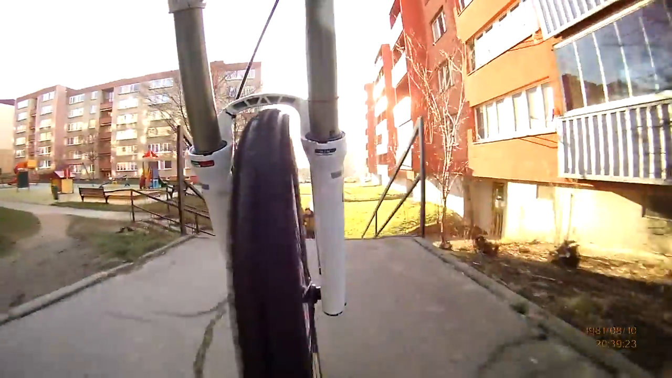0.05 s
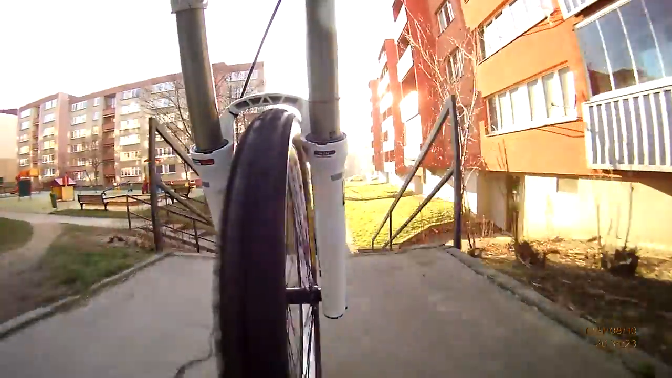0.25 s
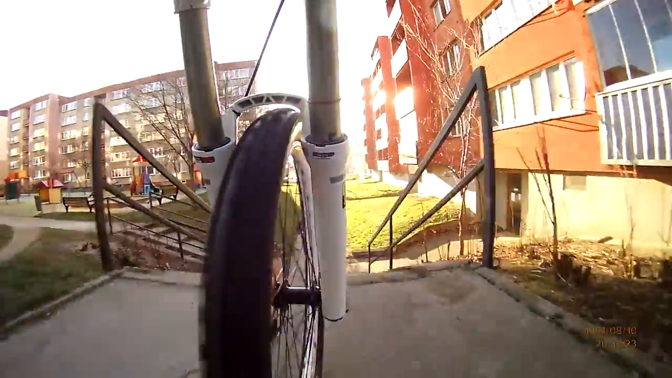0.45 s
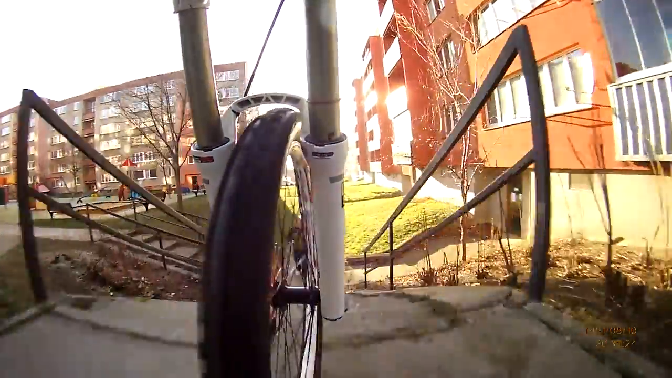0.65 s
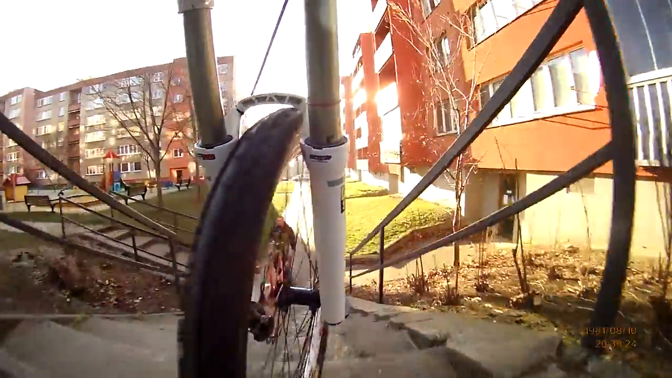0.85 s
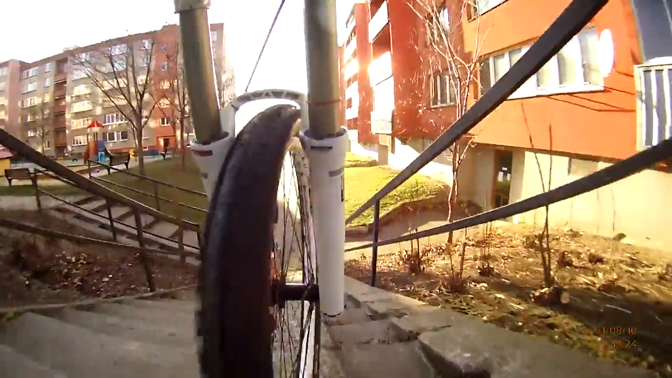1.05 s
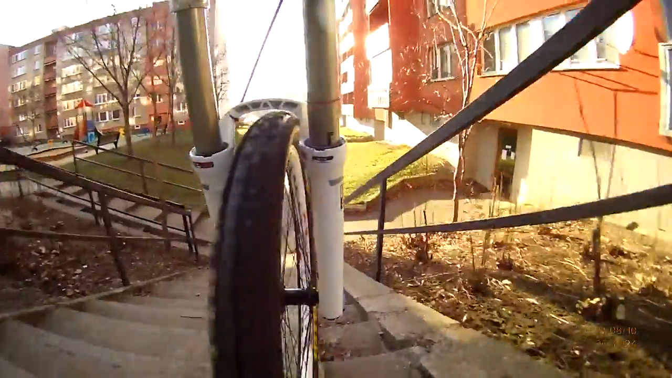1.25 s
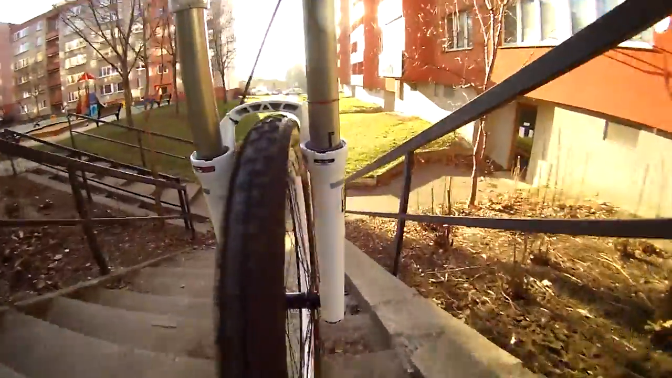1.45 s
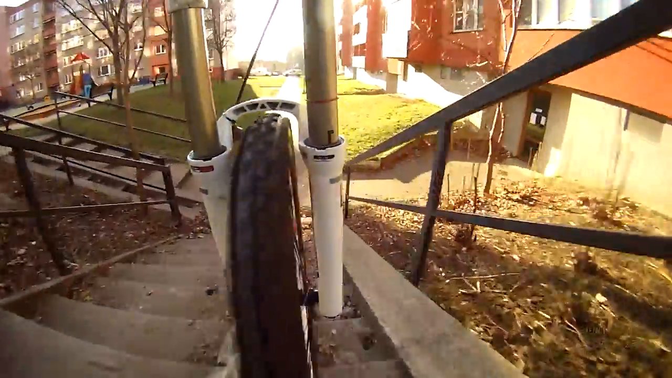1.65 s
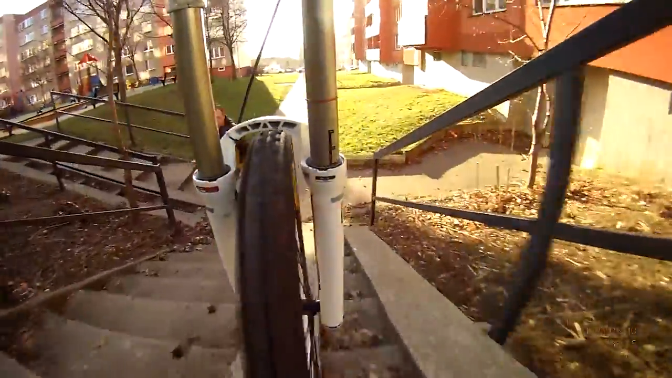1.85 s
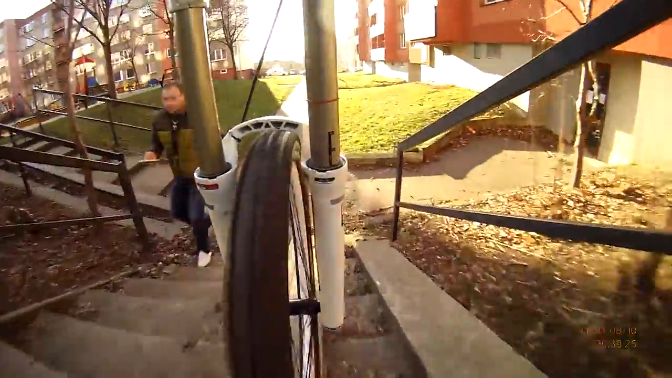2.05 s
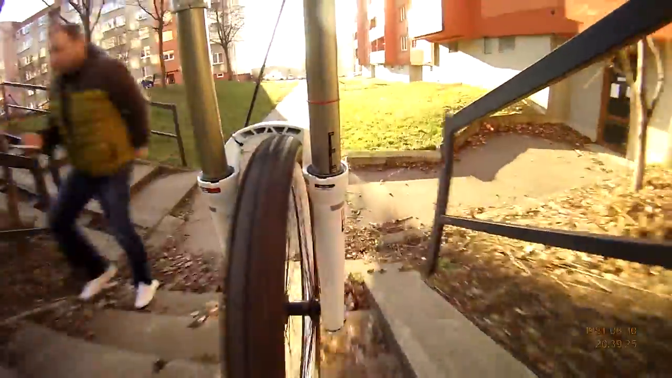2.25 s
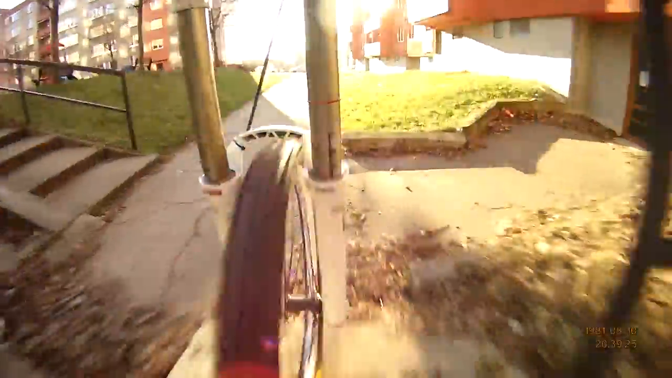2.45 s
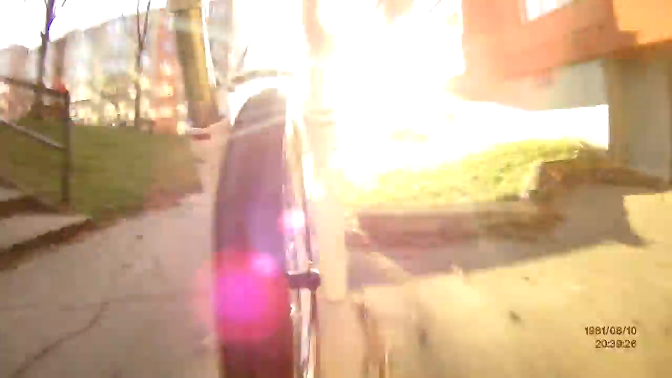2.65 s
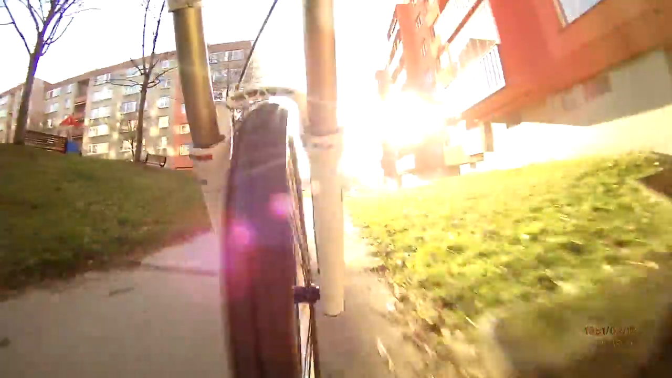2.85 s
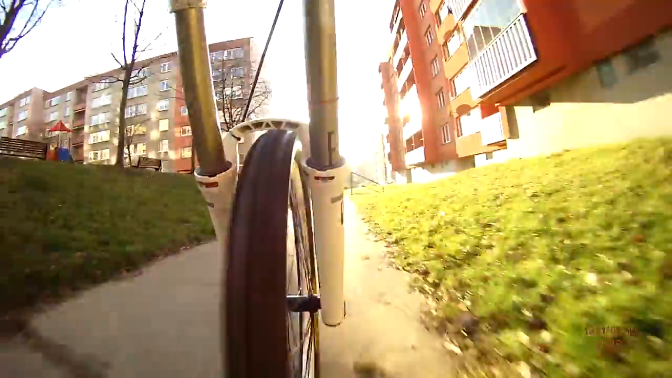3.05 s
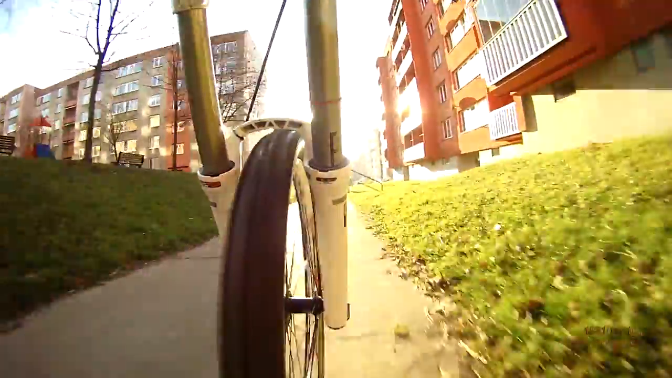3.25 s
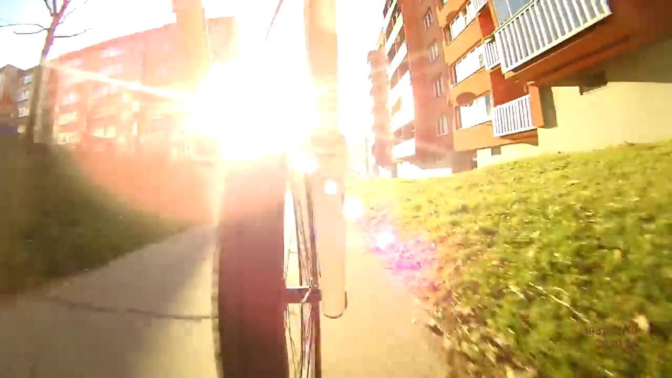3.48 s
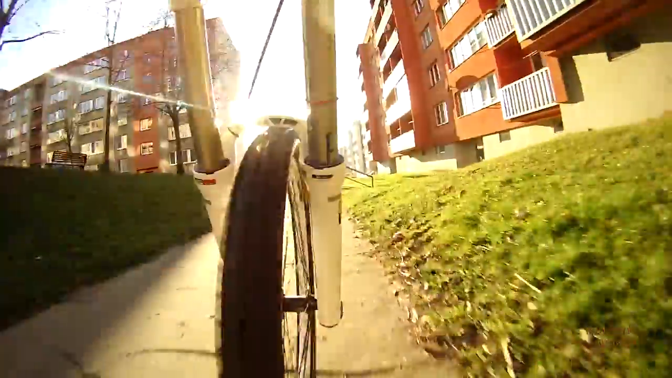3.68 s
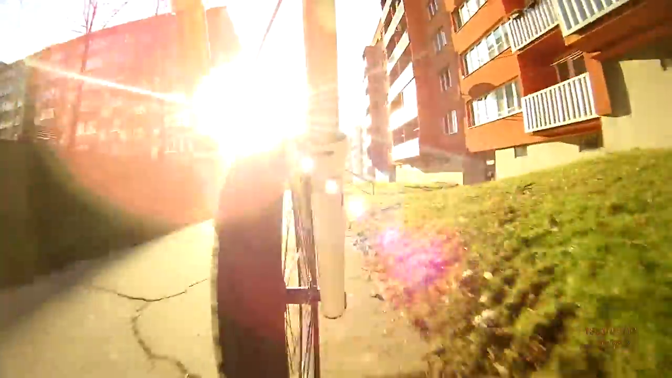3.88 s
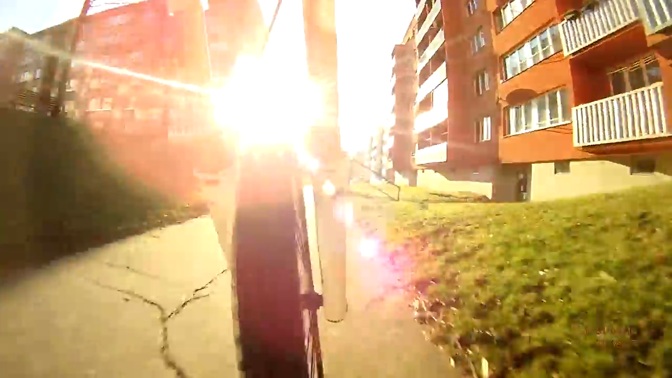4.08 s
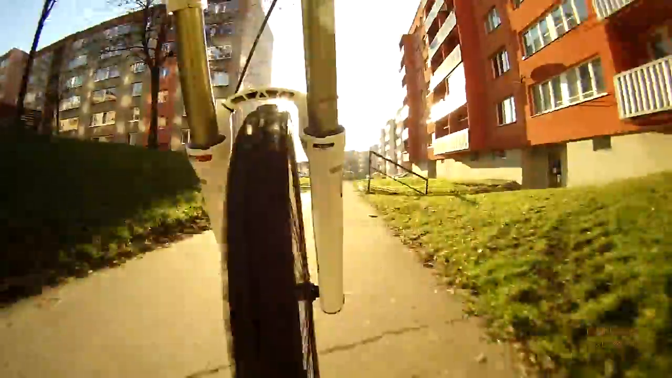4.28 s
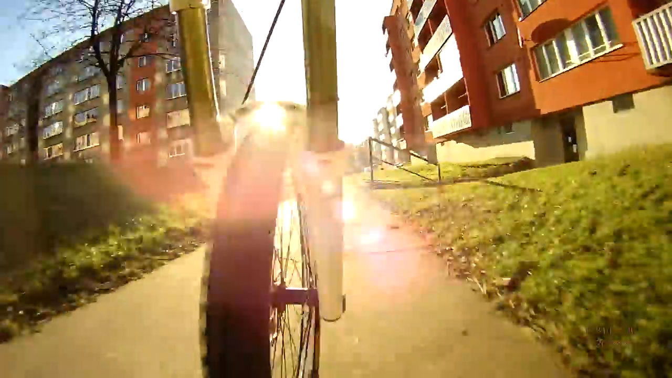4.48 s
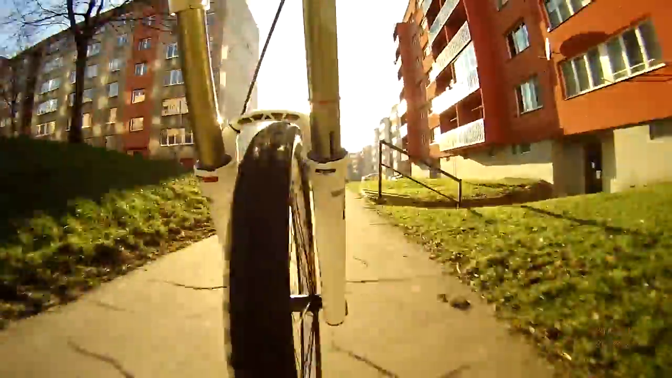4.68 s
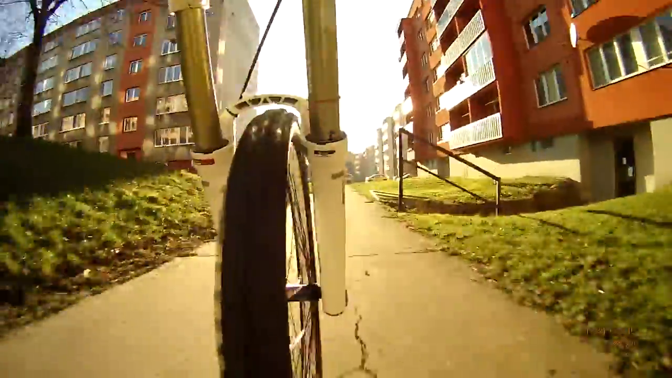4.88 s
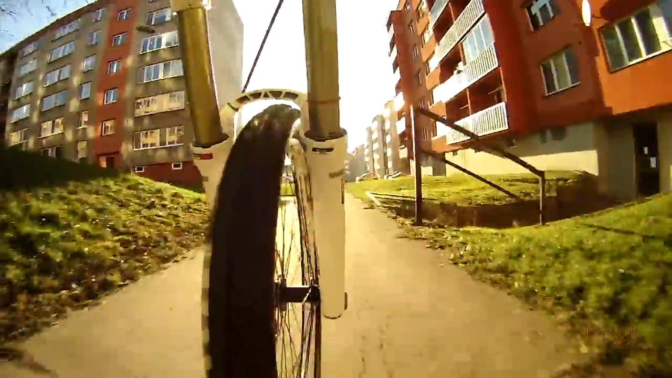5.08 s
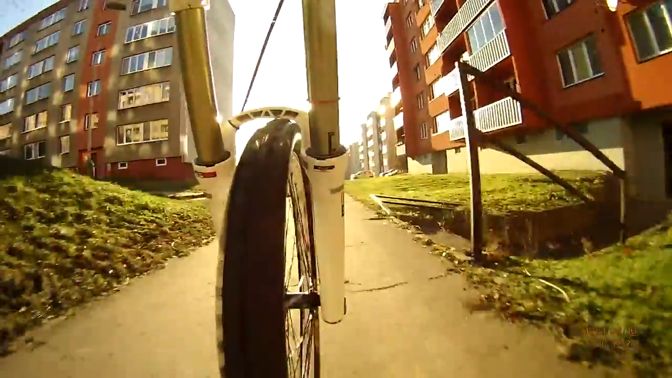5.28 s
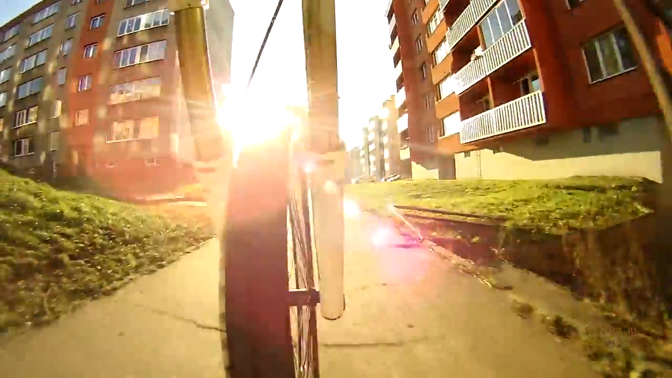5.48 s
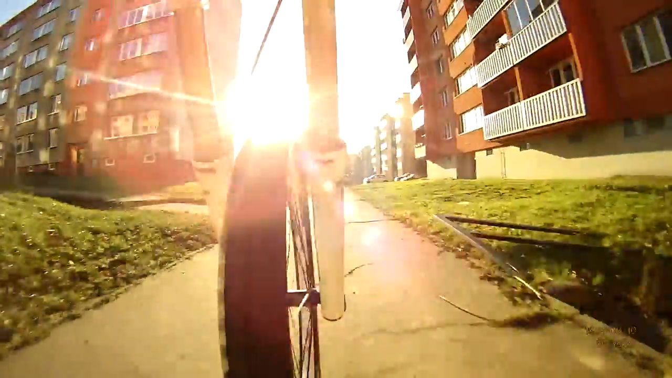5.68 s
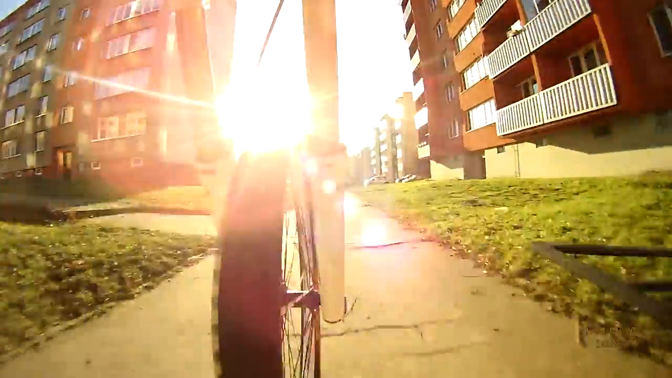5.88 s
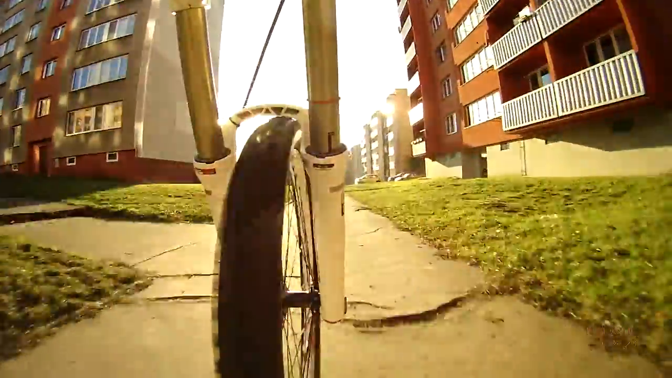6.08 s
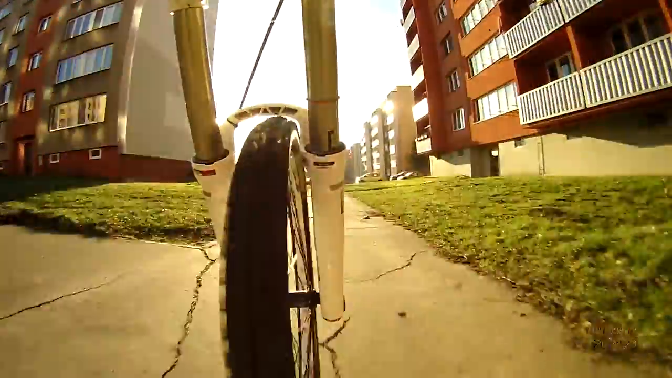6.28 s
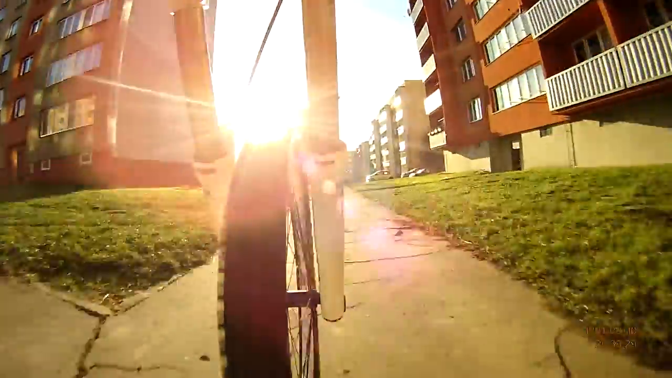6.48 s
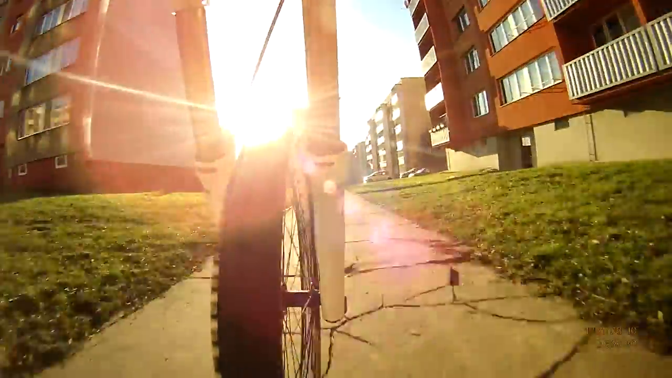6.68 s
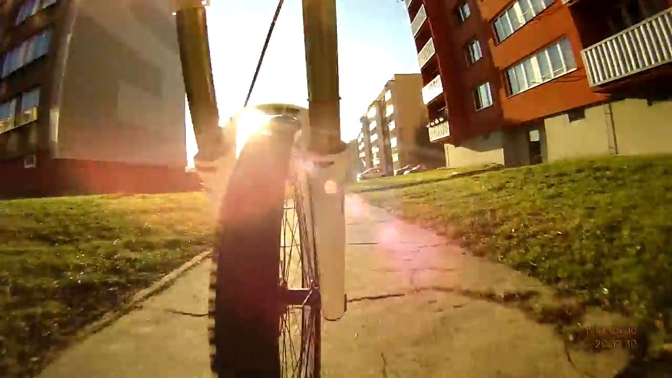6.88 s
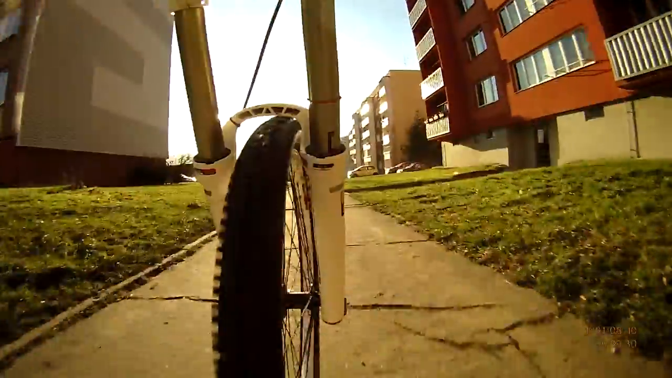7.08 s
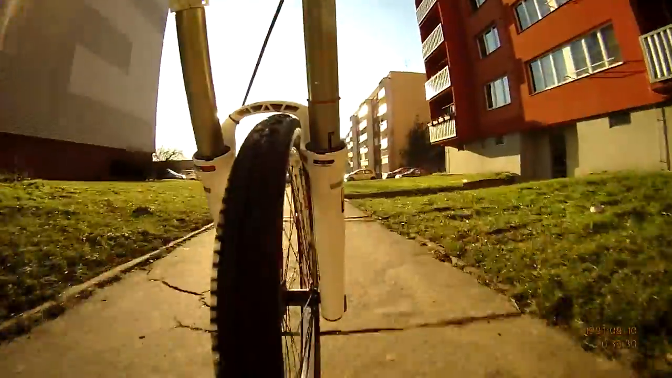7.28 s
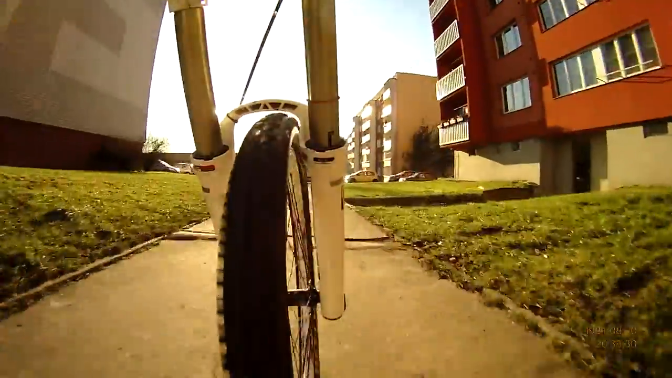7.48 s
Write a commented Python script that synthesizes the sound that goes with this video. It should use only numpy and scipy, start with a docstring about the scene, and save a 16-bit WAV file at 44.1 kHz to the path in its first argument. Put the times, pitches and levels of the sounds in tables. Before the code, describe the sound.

A microphone fixed to a mountain bike picks up close, dry, muffled vibration. The bike brakes softly and drops down stairs with hollow thuds and cable slaps, slams onto the path hard enough to clip, and coasts with quick metallic hub clicks and grit crackle. After the clicks end, only low rumble and mount hum remain, broken by a couple of cracks in the pavement near the end.

```python
"""On concrete stairs and a cracked path, a mountain bike with a camera on its frame brakes down, lands hard and coasts.
Each edge jolts the bike: it sways, thuds through the frame and makes loose parts knock and rattle.
The freewheel ticks in step with the wheel on the long coast, with a few faint single ticks early on.
Wheel speed drives the tyre rumble and the crackle of grit; rough ground shakes the bike, the camera mount hums,
and the brake hisses at the top of the stairs. The landing overloads the microphone."""
import sys
import numpy as np
from scipy import signal
from scipy.fft import rfft, irfft, next_fast_len
from scipy.io import wavfile
from scipy.ndimage import uniform_filter1d

SR = 44100
rng = np.random.default_rng(int(sys.argv[2]) if len(sys.argv) > 2 else 0)


def wav_record(signal):
    """Record a signal, one row per channel, as 16-bit PCM in the file named by sys.argv[1]."""
    frames = np.transpose(np.atleast_2d(signal))
    bounded = np.clip(frames, -1, 1)
    # unit amplitude maps onto the largest positive 16-bit level
    quanta = np.round(bounded * 32767).astype(np.int16)
    wavfile.write(sys.argv[1], SR, quanta)


N = 332514
T = np.arange(N) / SR  # time of every sample, in s


def amp(db):
    """Decibels to gain."""
    return 10 ** (np.asarray(db) / 20)


def unit(x):
    """Scale to rms 1."""
    return x / np.sqrt(np.mean(x ** 2))


def curve(rows):
    """A table of (t/s, value), joined by straight lines in time."""
    return np.interp(T, *np.transpose(rows))


def add(out, start_s, x):
    """Mix x into out from a start time, cutting off what runs past the end."""
    i = max(int(start_s * SR), 0)
    out[i:i + len(x)] += x[:max(N - i, 0)]


def colour(x, points):
    """Filter through (f/Hz, level/dB) points; minimum phase, so nothing sounds before its cause."""
    size = next_fast_len(len(x) + 2048)
    size += size % 2
    hz, db = np.transpose(points)
    f = np.maximum(np.arange(size // 2 + 1) * SR / size, 1)
    gain_db = np.interp(np.log(f), np.log(hz), db)
    # folding the cepstrum onto positive times gives the minimum phase
    cepstrum = irfft(np.log(amp(gain_db)))
    cepstrum[1:size // 2] *= 2
    cepstrum[size // 2 + 1:] = 0
    response = np.exp(rfft(cepstrum))
    return irfft(rfft(x, size) * response)[:len(x)]


def band(x, hz, width):
    """One resonance, gain 1 at its centre."""
    return signal.lfilter(*signal.iirpeak(hz, hz / width, fs=SR), x)


def ring(x, modes, leak=0.16):
    """A body of several resonances; a little of the blow passes straight through."""
    out = leak * x
    for k, (hz, width, db) in enumerate(modes):
        sign = (-1) ** k  # neighbouring resonances move in opposite directions
        out = out + sign * amp(db) * band(x, hz, width)
    return out


def walk(rate):
    """Smooth random wandering with a spread near 1, drawing new values at the given rate per second."""
    size = int(SR / rate)
    steps = np.repeat(rng.standard_normal(N // size + 1), size)
    return unit(uniform_filter1d(steps, size)[:N])


# jolts from steps, the landing and cracks:
# (t/s, sway level/dB, sway f/Hz, thud peak level/dB, f/Hz of the frame resonance hit hardest)
JOLTS = [(.945, -6, 24.3, -23.5, 368), (1.487, -7, 29, -15.5, 557), (1.503, -15.5, 140, -18.5, 110),
         (2.051, -9.5, 20, -26.5, 543), (2.309, -15, 24, -30, 390), (2.366, -11.5, 23, -23, 386),
         (2.43, -1.5, 24, -17, 280), (2.476, -6, 18, -21, 277), (2.521, 2.5, 19, -4, 275),
         (2.56, 3, 27, -11, 281.4), (2.611, 4.5, 14.8, 0.5, 291), (2.636, -9.5, 120, 2.5, 292),
         (2.665, -1, 20, -5, 296), (2.722, 10.5, 138, -0.5, 293), (2.804, -23, 59, -22, 265),
         (2.985, -15, 130, -10, 567), (2.998, -16, 130, -17, 172), (6.856, -8.5, 23.4, -24.5, 397),
         (7.04, -9.5, 17.6, -13.5, 380)]
# resonances of the frame: (f/Hz, width/Hz, level/dB)
FRAME_MODES = [(164.9, 39, -7.5), (255, 23.6, 1.5), (287, 26, -2), (407.4, 67.4, 6.5), (494.5, 66, 4),
               (552.4, 30.6, 10), (614, 47.4, 2), (845, 57, -7.5)]
# tone colour of thuds and tyre rumble: (f/Hz, level/dB)
TYRE_COLOUR = [(60, -31.5), (130, 4.5), (200, 1.5), (590, -8), (690, -7), (950, -9.5), (1300, -41),
               (3000, -83), (7000, -110)]


def jolts(thud_s=0.0095, contact_s=.001, mount_db=3, mode_db=8):
    """Each edge bounces the bike once on its tyres and thuds through frame and mount."""
    out, t = np.zeros(N), T[:SR // 4]
    contact = 1 - np.exp(-t / contact_s)
    for start_s, sway_db, sway_hz, thud_db, mode_hz in JOLTS:
        # the fourth power stops the sway after about one swing
        sway = contact * np.sin(2 * np.pi * sway_hz * t) * np.exp(-(sway_hz * t) ** 4)
        blow = rng.standard_normal(len(t)) * contact * np.exp(-t / thud_s)
        frame = ring(blow, FRAME_MODES, leak=0.33)
        hardest_hit = amp(mode_db) * band(frame, mode_hz, 34)
        mount = amp(mount_db) * band(blow, 105, 38)
        thud = colour(frame + hardest_hit + mount, TYRE_COLOUR)
        add(out, start_s, amp(sway_db) * sway + amp(thud_db) * thud / abs(thud).max())
    return out


# resonances of the camera case: (f/Hz, width/Hz, level/dB)
CASE_MODES = [(1023.3, 29, 7.5), (1262, 135, 9), (1462.4, 70, 9.5), (1597, 180, 3.5), (2193, 180, -0.5),
              (2421, 150, 3.5), (3570, 120, -15), (4574, 130, -26)]
# tone colour of loose parts: (f/Hz, level/dB)
RATTLE_COLOUR = [(250, -23), (900, -3.5), (1200, 2.5), (2600, 5.5), (2900, -4.5), (3600, -14.5),
                 (5500, -20.5), (6800, -41.5), (12000, -62.5)]


def knock(hz, decay_s, contact_s=0.00041, width_hz=1300, direct_db=-9, tail_db=-22, tail_s=0.013):
    """A loose part slaps and chatters in its own pitch region and rings the case; peak 1."""
    t = T[:SR // 8]
    onset = 1 - np.exp(-t / contact_s)
    fade = np.exp(-t / decay_s) + amp(tail_db) * np.exp(-t / tail_s)
    chatter = rng.standard_normal(len(t)) * onset * fade
    blow = band(chatter, hz, width_hz)
    sound = colour(ring(blow, CASE_MODES) + amp(direct_db) * blow, RATTLE_COLOUR)
    return sound / abs(sound).max()


# single knocks of cables, chain and fork: (t/s, peak level/dB, centre f/Hz, decay/s)
KNOCKS = [(0.917, -28, 3470, .0019), (.967, -19.5, 3000, .0013), (0.983, -27, 2800, .004),
          (1.489, -14.5, 1870, 0.0025), (1.55, -18.5, 2500, 0.0063), (1.575, -9.5, 1400, 0.00068),
          (1.775, -23, 1100, 0.0036), (1.848, -25.5, 4030, 0.0023), (2.068, -18.5, 1890, 0.001),
          (2.142, -25, 1500, .0025), (2.161, -25, 1790, 0.0018), (2.245, -21.5, 2300, 0.0018),
          (2.326, -17.5, 1700, .0018), (2.448, -17, 1600, 0.0098), (2.514, -14.5, 2520, .008),
          (2.526, -5, 2400, .006), (2.556, -6, 2050, 0.0075), (2.594, -10.5, 1990, 0.0054),
          (2.602, -6.5, 1492, 0.0045), (2.615, 1, 2210, .008), (2.634, 0, 1605, 0.0052),
          (2.662, 6, 1700, 0.0043), (2.721, 4.5, 1736, 0.0094), (2.806, -15.5, 2500, .003),
          (2.887, -11.5, 1710, 0.0023), (2.984, -11.5, 1480, 0.0058), (7.053, -12.5, 2070, 0.0055),
          (7.079, -13.5, 2100, 0.0024), (7.104, -20.5, 2350, .005), (7.12, -19, 2250, .0038)]


def knocks():
    """Cables, chain and fork each strike a single hard knock."""
    out = np.zeros(N)
    for start_s, db, hz, decay_s in KNOCKS:
        add(out, start_s, amp(db) * knock(hz, decay_s))
    return out


# bursts of rattling after the jolts, at most 12 slaps each:
# (start t/s, longest length/s, peak level/dB at the start before random scatter, centre f/Hz)
RATTLES = [(0.952, .02, -33, 3200), (1.497, .07, -15, 2400), (2.055, 0.031, -24, 2080),
           (2.375, 0.36, -27.5, 2000), (2.578, 0.027, -3, 1900), (2.675, 0.068, -3, 2300),
           (2.818, 0.036, -26, 2670), (2.994, 0.035, -21.5, 3600), (6.86, 0.039, -25.5, 2600),
           (7.065, 0.081, -21, 1600)]
SLAP_GAP_S, SLAP_DECAY_S = 0.016, .005
RATTLE_FADE_DB = 8.5  # over the full longest length


def rattles(jitter_s=.002, scatter_db=2.2, count=12):
    """Chain and cables slap again and again at uneven gaps, fading through each burst."""
    out = np.zeros(N)
    for start_s, longest_s, first_db, hz in RATTLES:
        for k, (late, strong) in enumerate(rng.standard_normal((count, 2))):
            age = k * SLAP_GAP_S
            if age < longest_s:
                db = first_db - RATTLE_FADE_DB * age / longest_s + scatter_db * strong
                slap = knock(hz, SLAP_DECAY_S)
                add(out, start_s + age + jitter_s * late, amp(db) * slap)
    return out


# resonances of the hub as the case passes them on: (f/Hz, width/Hz, level/dB)
HUB_MODES = [(1720, 72, -9.5), (2100, 55, -1.5), (2475, 146, 4.5), (4320, 180, -21.5), (4650, 110, -15),
             (5400, 88, -18)]
# tone colour of the way from hub to camera: (f/Hz, level/dB)
HUB_PATH = [(600, -28), (1500, 5.5), (2560, 6.5), (2850, -13), (3500, -24.5), (4700, -8.5), (5400, -24),
            (6200, -33.5), (12000, -72.5)]


def tick(slip_s=0.0018):
    """A pawl (the freewheel's small catch) slips off one tooth and sets the hub ringing."""
    t = T[:SR // 25]
    age = t / slip_s
    slip = rng.standard_normal(len(t)) * age * np.exp(-age ** 2 / 2)
    tone = colour(ring(slip, HUB_MODES, leak=0.043), HUB_PATH)
    # rms 1 over the loudest 5 ms
    return tone / np.sqrt(uniform_filter1d(tone ** 2, size=220).max())


# speed of the wheel: (t/s, turns per s)
WHEEL = [(0, 1), (1.4, 1), (2.0, 1.6), (2.8, 2.755), (3.05, 2.8), (3.3, 2.47), (3.6, 2.655), (3.9, 2.755),
         (4.15, 2.757), (4.4, 2.873), (4.7, 3.067), (5.0, 2.6)]
CRUISE_TURNS_PER_S = 2.7


def speed_db():
    """Wheel speed in dB relative to cruising."""
    return 20 * np.log10(curve(WHEEL) / CRUISE_TURNS_PER_S)


# the long coast: (start t/s, end t/s)
COAST = (2.788, 4.98)


def in_long_coast():
    """True during the long coast, when the fast run of ticks sounds."""
    return (T > COAST[0]) & (T < COAST[1])


# single pawl ticks, a few faint slow ones early, then the loudest of the coasting run:
# (t/s, rms level/dB of the loudest 5 ms)
SINGLE_TICKS = [(0.526, -37), (.572, -33), (0.627, -39), (.68, -36), (2.806, -20.5), (2.884, -23),
                (3.172, -22), (3.192, -22), (3.48, -25.5), (3.561, -23.5), (3.664, -24.5), (3.833, -23.5),
                (3.873, -24.5), (3.914, -19), (3.932, -22.5), (3.951, -21), (4.032, -22), (4.235, -27),
                (4.316, -26), (4.429, -25.5), (4.543, -23.5), (4.67, -21.5), (4.918, -26)]
TEETH = 18


def freewheel(tick_db=-30, swell_db=1.5, speed_power=2.0, scatter_db=2.2):
    """One tick per tooth on the long coast: louder with speed, swelling once a turn as the hub runs off centre."""
    out, speed = np.zeros(N), speed_db()
    teeth_passed = TEETH * np.cumsum(curve(WHEEL) * in_long_coast()) / SR
    tick_samples = np.searchsorted(teeth_passed, np.arange(1, teeth_passed[-1]))
    for tooth, i in enumerate(tick_samples, start=1):
        swell = swell_db * np.cos(2 * np.pi * tooth / TEETH)
        db = tick_db + speed_power * speed[i] + swell + scatter_db * rng.standard_normal()
        # a single tick takes the place of any ordinary tick within 10 ms
        if all(abs(T[i] - single_s) > .01 for single_s, _ in SINGLE_TICKS):
            add(out, T[i], amp(db) * tick())
    for single_s, db in SINGLE_TICKS:
        add(out, single_s, amp(db) * tick())
    return out


def shudder(decay_s, rise_s=0.0013):
    """Strength of the trembling that the thuds leave in the bike."""
    power, t = np.zeros(N), T[:SR]
    envelope = (1 - np.exp(-t / rise_s)) ** 2 * np.exp(-t / decay_s)
    for start_s, _, _, thud_db, _ in JOLTS:
        add(power, start_s, (amp(thud_db) * envelope) ** 2)
    return np.sqrt(power)


def tyre_noise():
    """Steady noise of the tread, rung by the frame; rms 1."""
    return unit(colour(ring(rng.standard_normal(N), FRAME_MODES, leak=0.12), TYRE_COLOUR))


def tread(tyre_db=-33.5, speed_power=1.13, jolt_db=-19, settle_s=0.11, uneven_db=1, thinning=0.97):
    """The tread rings the frame, louder with speed and after each thud."""
    tyre = tyre_noise()
    drive_db = speed_power * speed_db()
    # rolling gently, the tread hardly drives the low frame modes
    low_gain = amp(thinning * np.minimum(drive_db, 0))
    rolling = tyre + (low_gain - 1) * band(tyre, 240, 170)
    rolling_gain = amp(tyre_db + drive_db + uneven_db * walk(25))
    tremble = tyre_noise() * amp(jolt_db) * shudder(settle_s)
    return rolling * rolling_gain + tremble


# tone colour of the shaking: (f/Hz, level/dB)
SHAKE_COLOUR = [(10, -17.5), (22, 10.5), (32, -1.5), (44, -2.5), (68, -0.5), (82, -3.5), (100, -2),
                (150, -29), (300, -68), (900, -120)]
# roughness of top landing, stairs, smooth path and cracked slabs: (t/s, level/dB over the smooth path)
GROUND = [(0, 0), (.6, -4), (1.35, -1), (1.9, 8.5), (2.4, 9), (2.8, 2), (3.3, 6), (3.6, -0.5), (4.8, 1),
          (5.25, 2.5), (6.2, -2), (6.7, 3), (7.1, 10.5), (7.54, 0.5)]
# hum of the camera mount between the jolts, before its random wavering: (t/s, level/dB)
MOUNT = [(0, -30), (.4, -32), (.58, -30.5), (.9, -37.5), (1.4, -35.5), (2.05, -28), (2.8, -24), (3.12, -30),
         (4.1, -30), (5.0, -30), (5.17, -37.5), (5.7, -28.5), (6.28, -28), (6.6, -34), (7.1, -26.5),
         (7.45, -24.5)]


def shaking(shake_db=-31, mount_hz=110, jolt_db=-19, settle_s=0.13, waver_db=2.8):
    """Rough concrete shakes the bike and hums in the camera mount, which rings on after each thud."""
    noise = rng.standard_normal((2, N))
    shake = unit(colour(noise[0], SHAKE_COLOUR)) * amp(shake_db + curve(GROUND))
    swing = band(band(noise[1], mount_hz, 14), mount_hz, 23)
    # friction in the clamp evens out the mount's swings
    hum = unit(swing / uniform_filter1d(swing ** 2, size=3000) ** (1 / 3))
    drive = amp(curve(MOUNT) + waver_db * walk(5))
    return shake + hum * np.hypot(drive, amp(jolt_db) * shudder(settle_s))


def grains(grain_db=4, grains_per_s=14000):
    """Dense fine impacts of uneven strength ring the camera case."""
    hits = rng.random(N) < grains_per_s / SR
    clicks = rng.standard_normal(N) * hits * amp(grain_db * rng.standard_normal(N))
    return ring(clicks, CASE_MODES, leak=0.21)


# tone colour of grit: (f/Hz, level/dB)
GRIT_COLOUR = [(400, -38), (800, 5), (1050, -11.5), (2550, -4.5), (2800, -9), (3100, -9), (3350, -21),
               (3700, -17), (4200, -24), (4700, -22), (5400, -32.5), (6200, -39), (12000, -77.5)]


def friction(grit_db=-43, speed_power=1.4, whirr_db=-41, jolt_db=-24, settle_s=0.069, uneven_db=1.26):
    """Grit crackles under the tyre, more with speed and after each thud; on the long coast the hub adds its whirr."""
    coasting = uniform_filter1d(1. * in_long_coast(), size=6000)  # softened start and end
    grit = amp(grit_db + speed_power * speed_db())
    whirr = amp(whirr_db) * coasting
    tremble = amp(jolt_db) * shudder(settle_s)
    drive = np.linalg.norm([grit, whirr, tremble], axis=0)  # the powers add
    return unit(colour(grains(), GRIT_COLOUR)) * drive * amp(uneven_db * walk(25))


# tone colour of the rubbing brake: (f/Hz, level/dB)
RUB_COLOUR = [(400, -26.5), (800, 1.5), (1050, -10), (1300, -5), (1800, -4.5), (2500, -6.5), (3050, -19),
              (3700, -22.5), (4200, -32), (4700, -22.5), (5600, -40.5), (12000, -79)]
# rub of the brake at the top of the stairs: (t/s, rms level/dB)
BRAKE = [(0, -43), (.9, -42), (1.3, -39), (1.65, -43), (2.0, -73)]


def brake():
    """The pads hiss as they hold the bike back on the first steps."""
    return unit(colour(grains(), RUB_COLOUR)) * amp(curve(BRAKE))


def scene():
    """Everything reaches the camera through the frame."""
    impacts = jolts() + knocks() + rattles()
    rolling = freewheel() + tread() + shaking() + friction() + brake()
    return (impacts + rolling)[None]


def record(dry, ceiling=.69, hiss_db=-81, top_hz=15900):
    """The microphone clips on the hardest blows, hisses faintly and loses the top."""
    # remove what lies below hearing
    steady = signal.sosfilt(signal.butter(1, 2, "high", fs=SR, output="sos"), dry)
    drive = steady / ceiling
    clipped = ceiling * drive / (1 + drive ** 12) ** (1 / 12)
    hiss = amp(hiss_db) * rng.standard_normal(dry.shape)
    low_pass = signal.ellip(8, .2, 70, top_hz, fs=SR, output="sos")
    return signal.sosfilt(low_pass, clipped + hiss)


dry = scene()
out = record(dry)
wav_record(out)
```